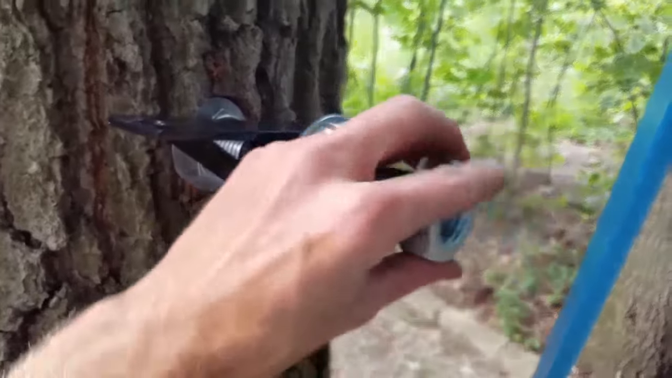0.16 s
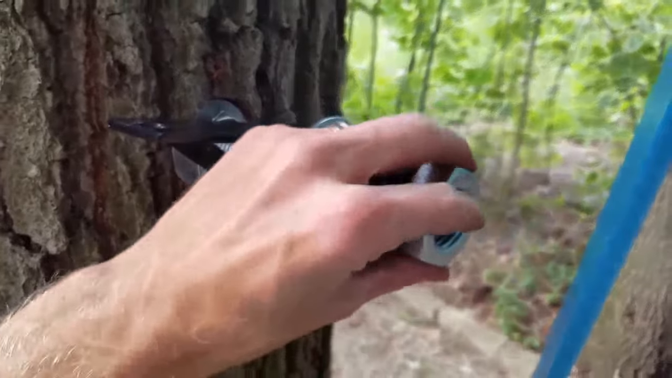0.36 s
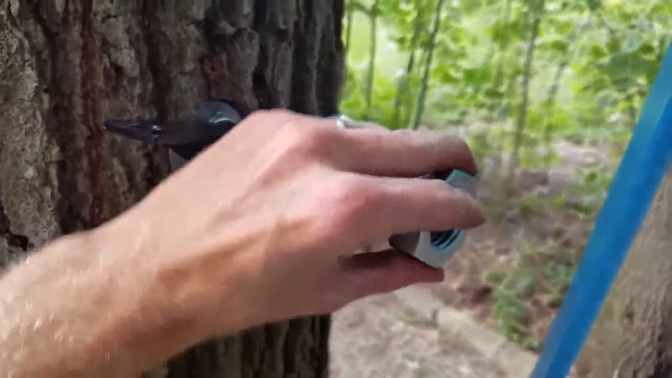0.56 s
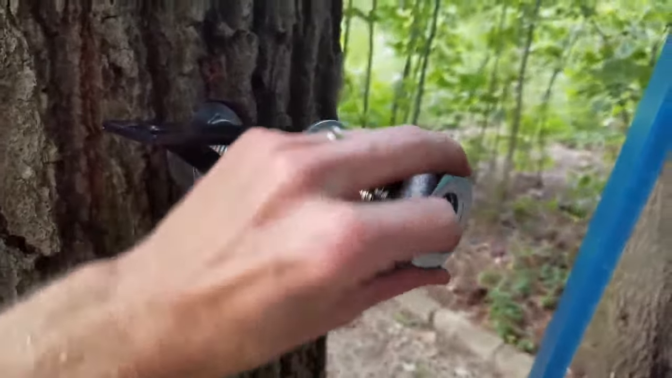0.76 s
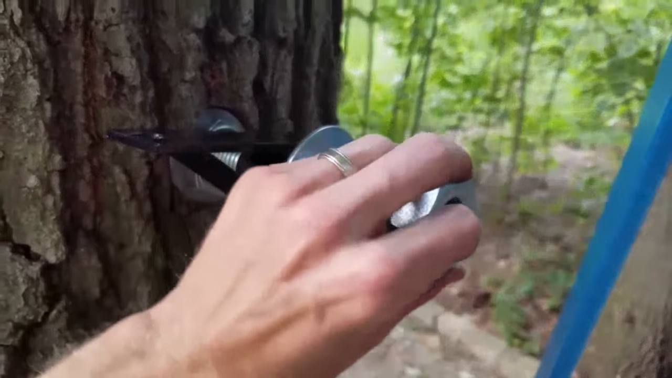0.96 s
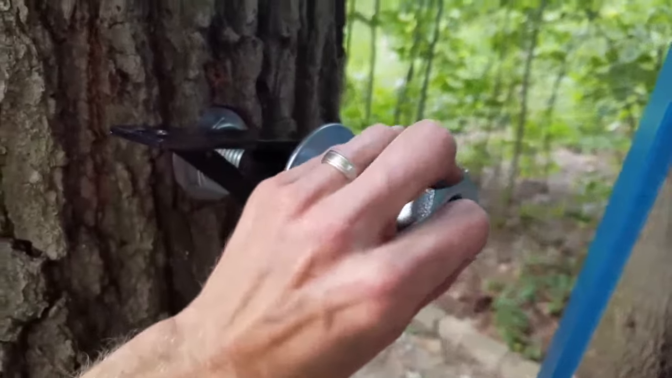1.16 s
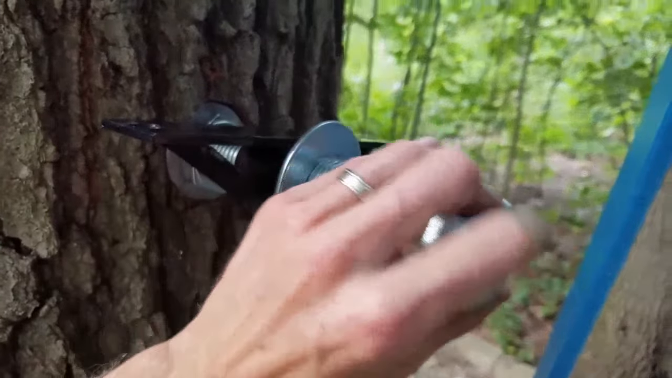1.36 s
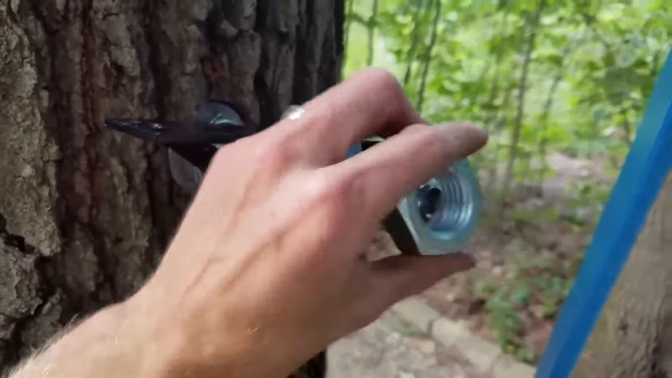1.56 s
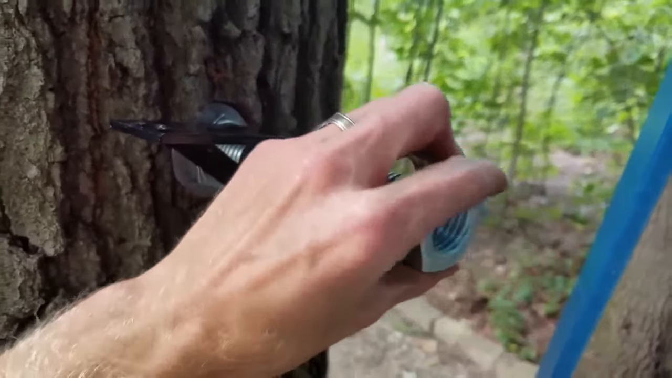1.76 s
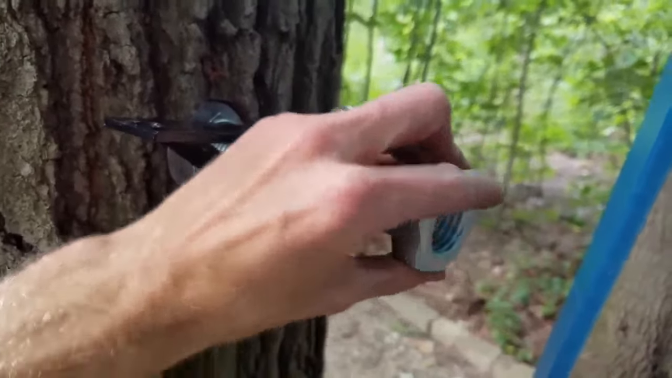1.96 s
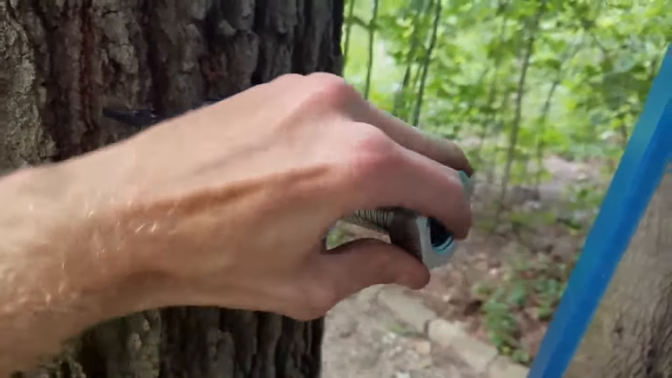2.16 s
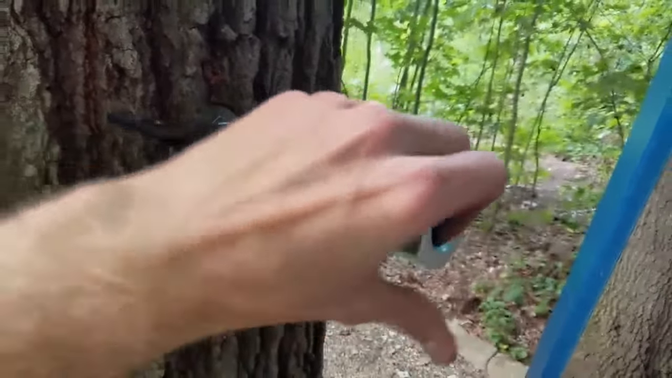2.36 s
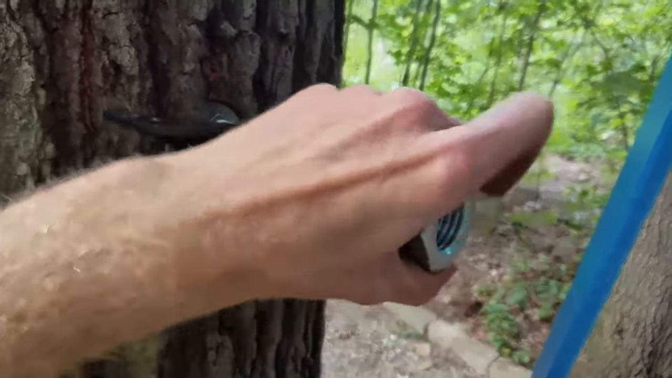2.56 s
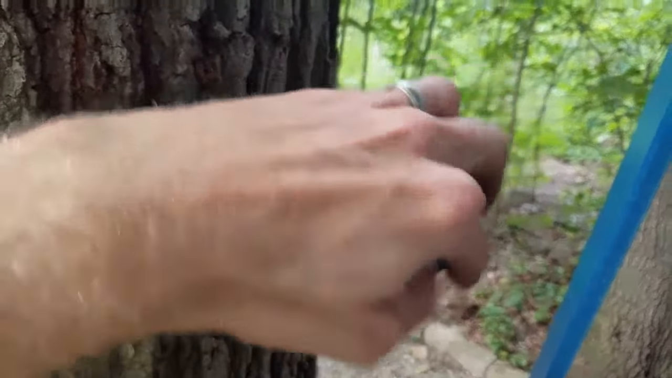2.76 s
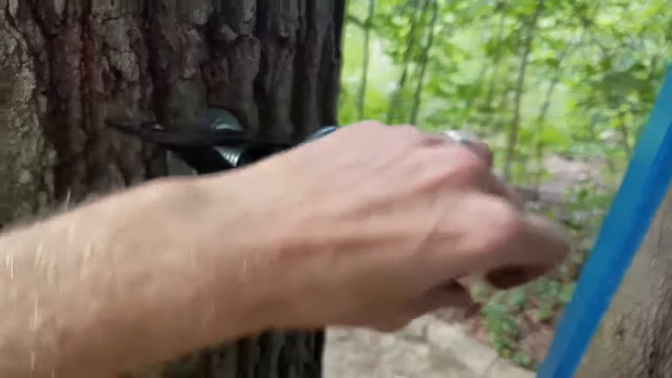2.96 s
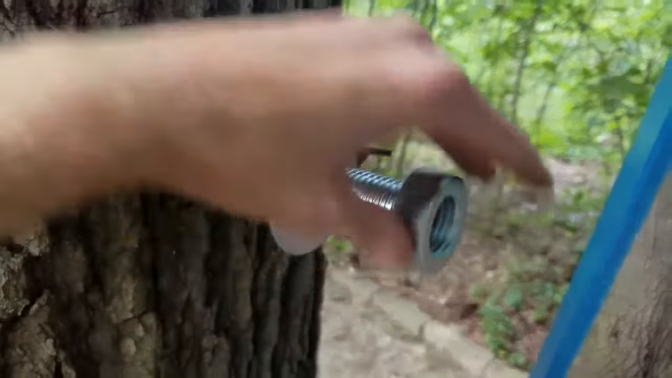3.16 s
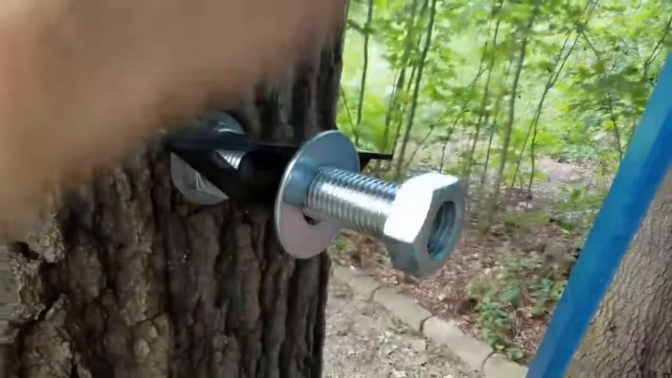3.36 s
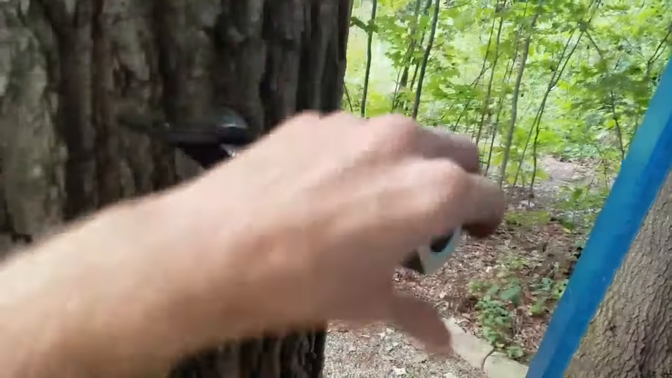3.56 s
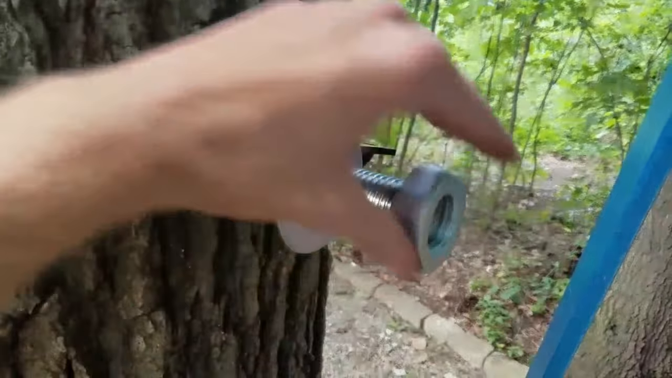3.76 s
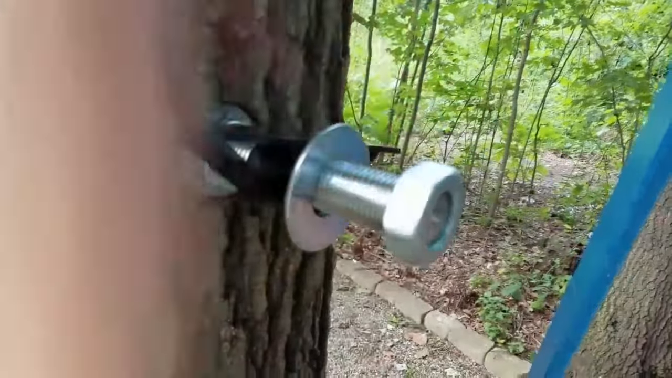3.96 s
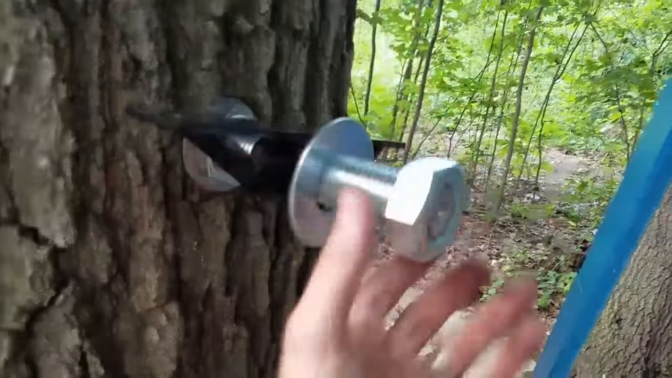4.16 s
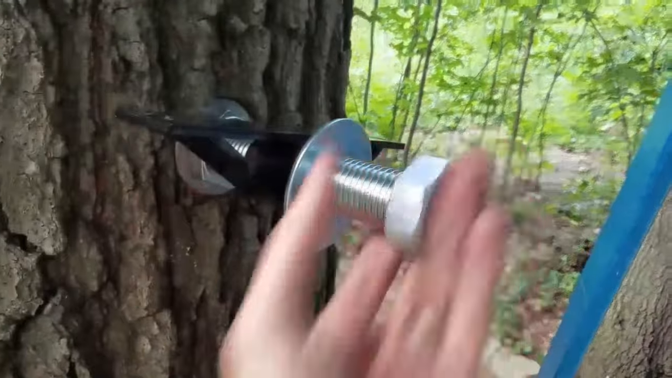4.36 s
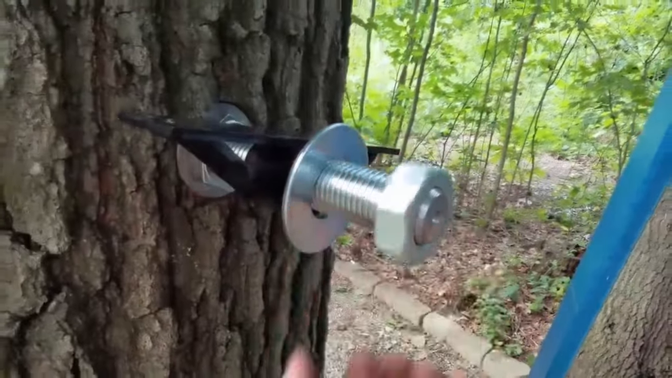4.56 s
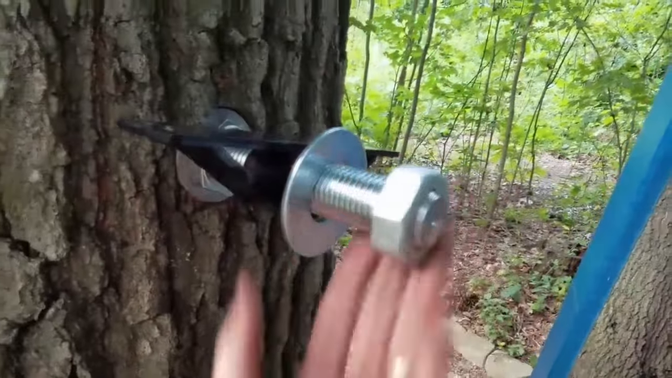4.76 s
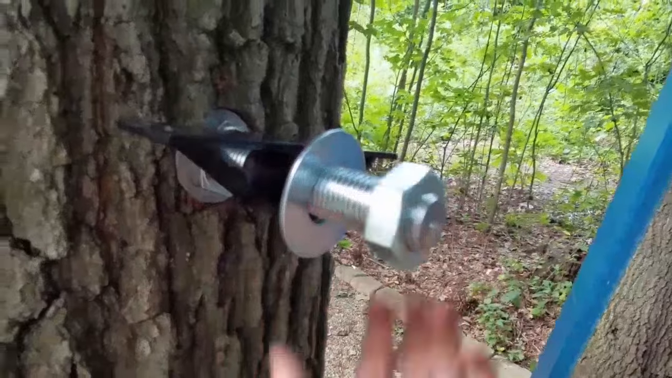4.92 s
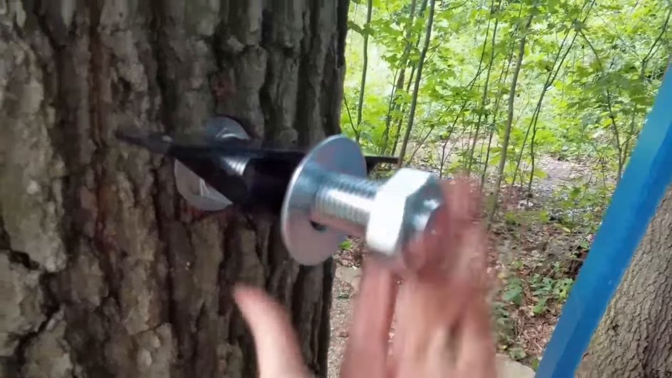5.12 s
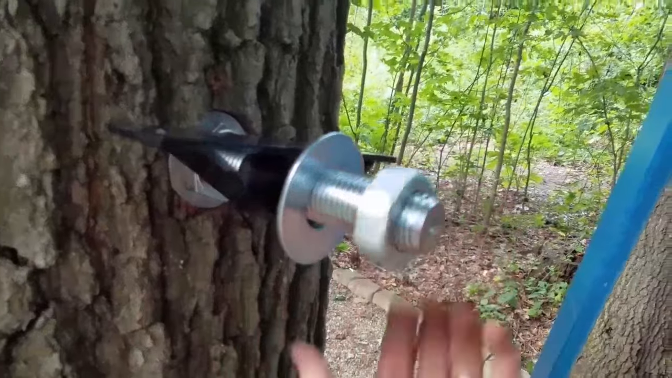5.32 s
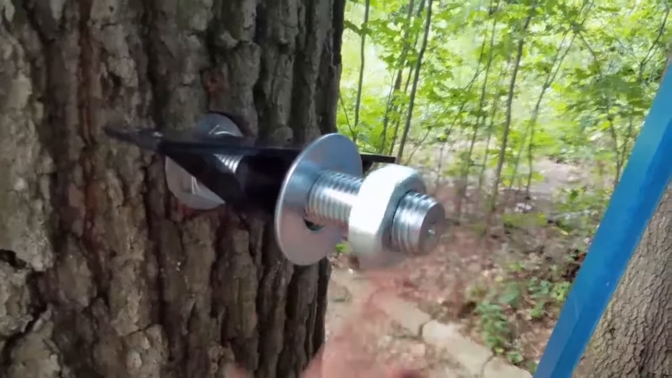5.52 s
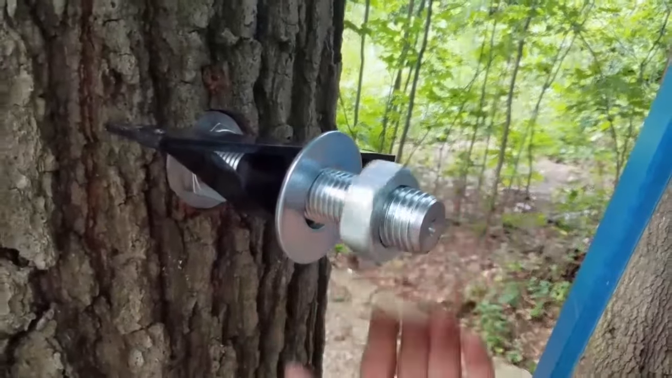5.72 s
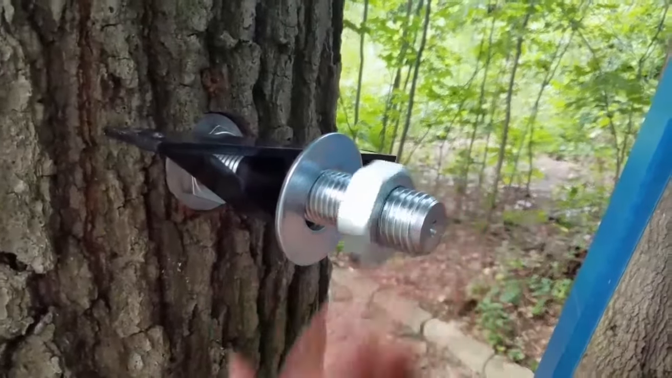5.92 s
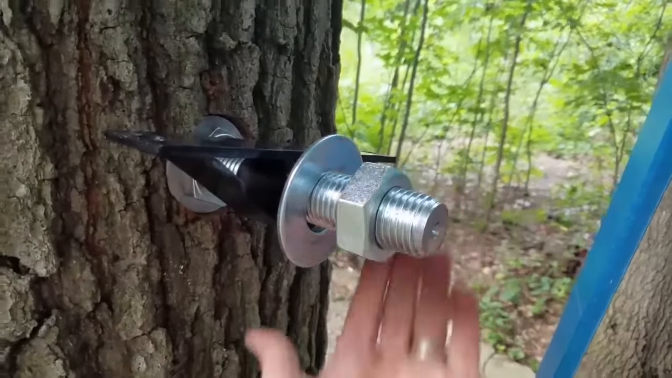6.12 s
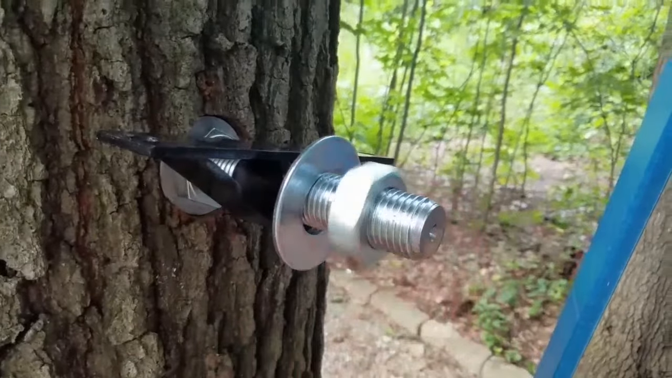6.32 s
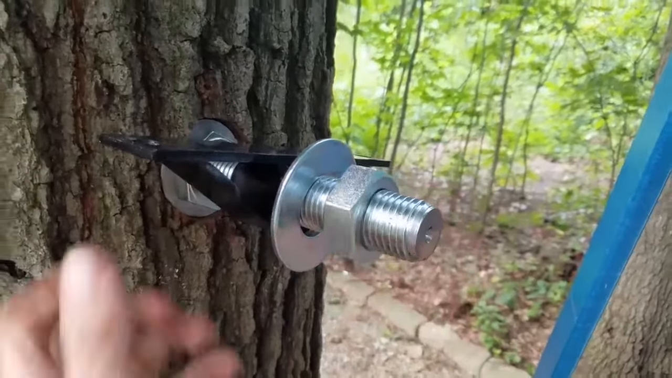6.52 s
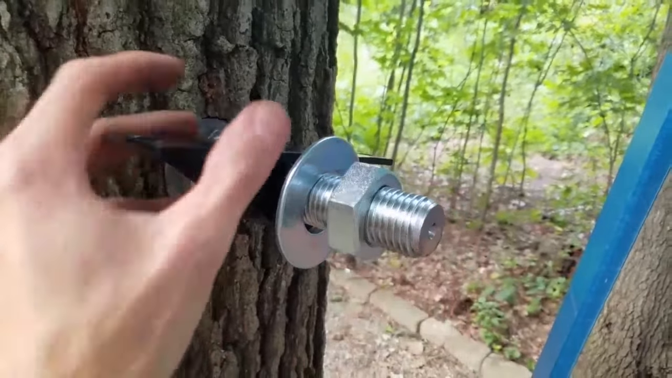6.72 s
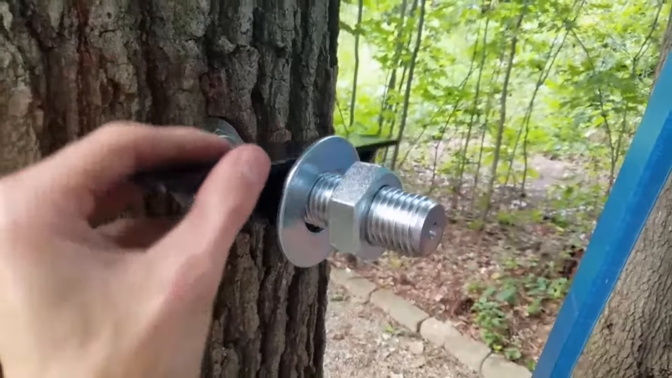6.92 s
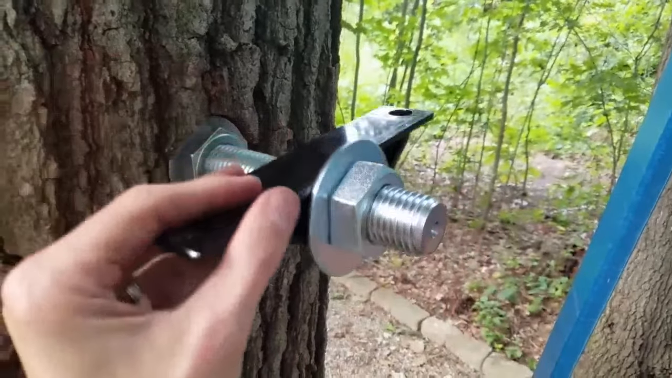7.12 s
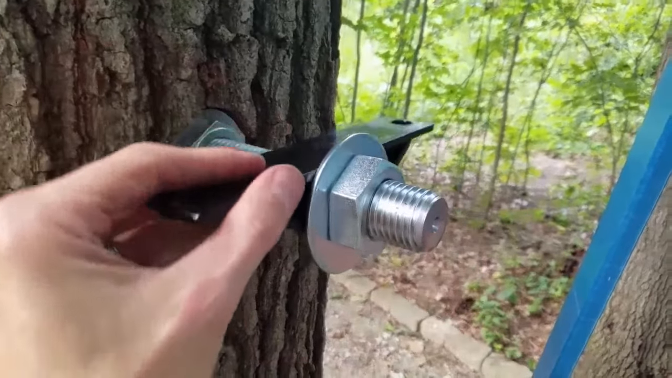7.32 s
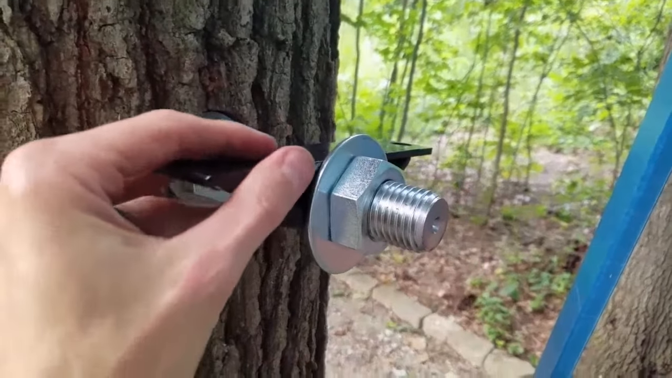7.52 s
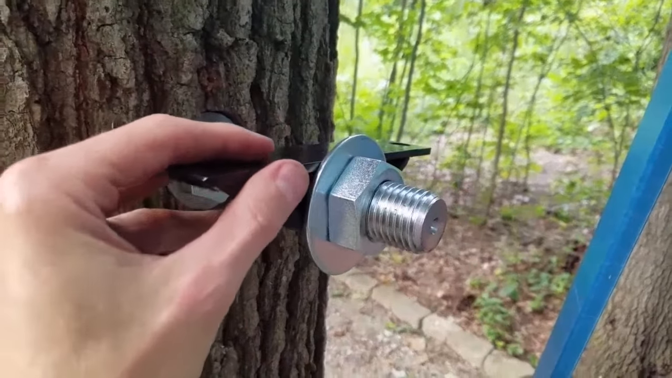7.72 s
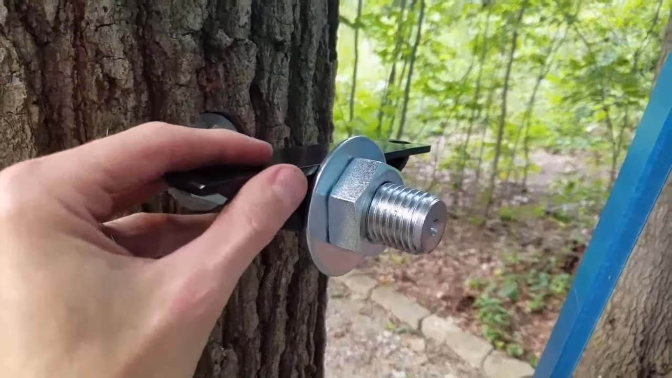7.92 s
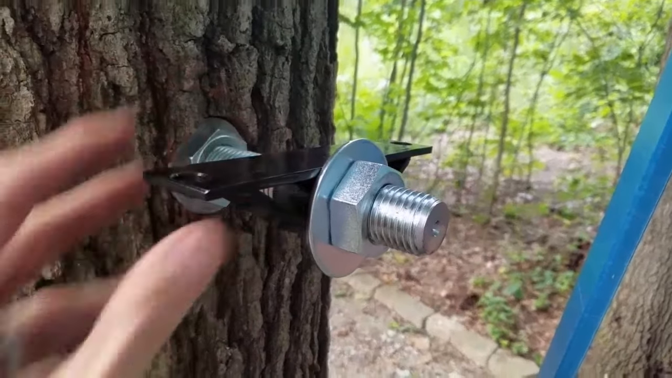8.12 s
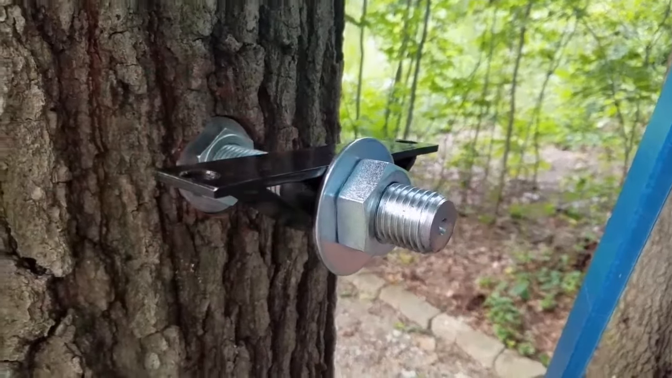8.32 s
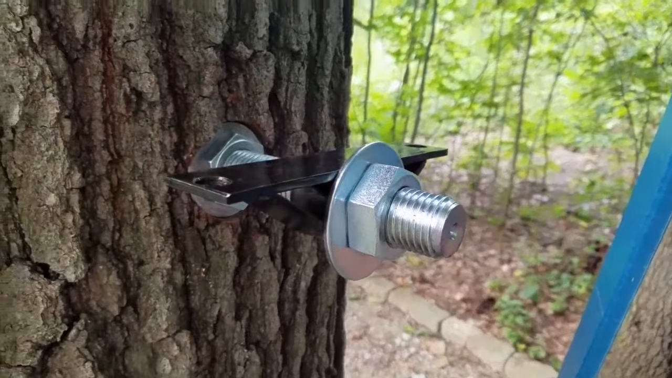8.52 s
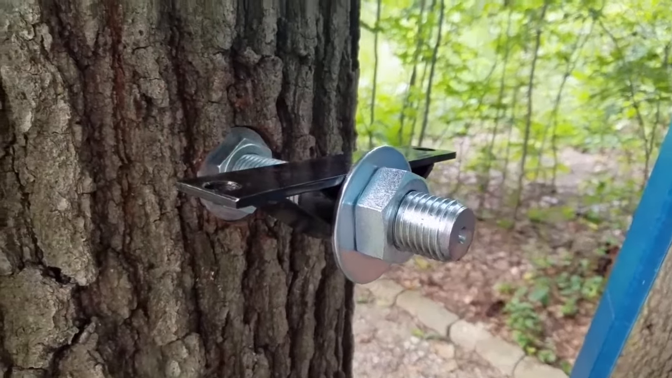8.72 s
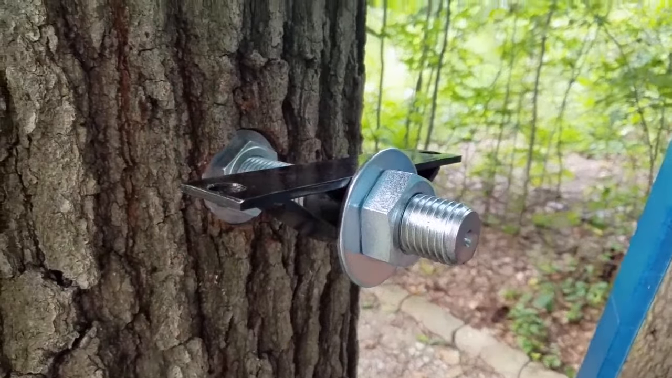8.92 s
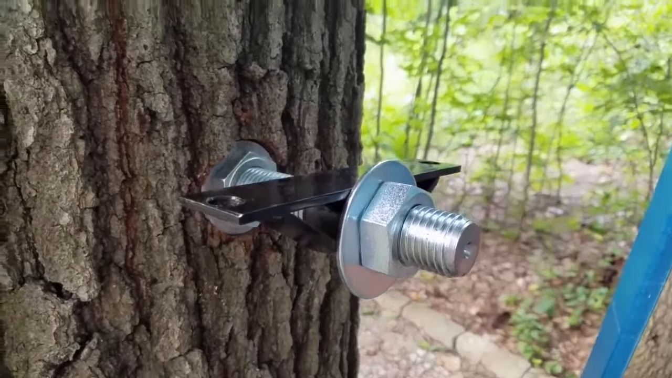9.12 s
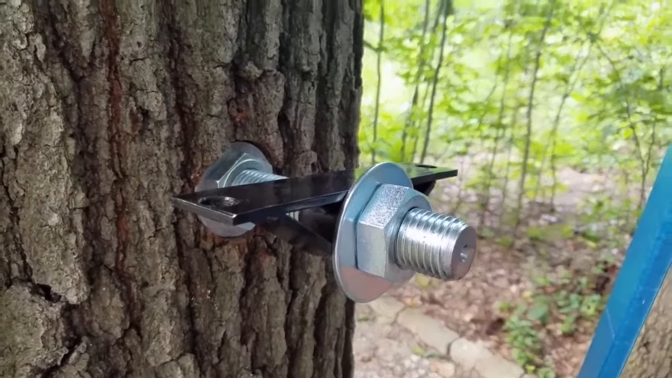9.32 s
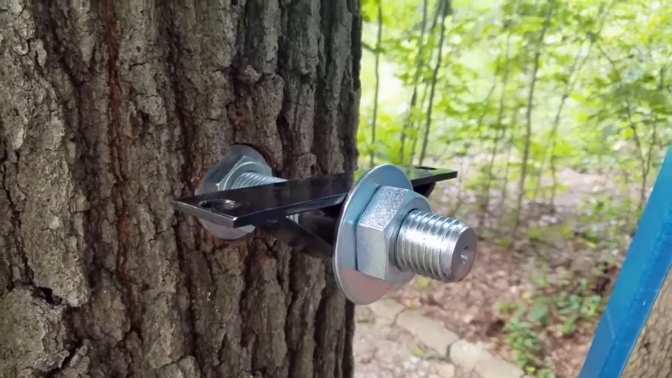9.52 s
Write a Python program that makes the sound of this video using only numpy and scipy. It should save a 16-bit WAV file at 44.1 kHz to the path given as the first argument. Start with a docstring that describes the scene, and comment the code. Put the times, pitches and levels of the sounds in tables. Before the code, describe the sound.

Quiet woodland: a low murmur of air and a faint, steady high insect hiss all around. Close up and slightly right, a heavy steel nut strikes a thick bolt in a tree at 0.3-0.5 s, a hard clank with a loose washer's thin hum. From 1.7 to 3.8 s it is turned by hand in uneven clinks, knocks and tiny thread rattles. From about 4 to 6.6 s come seven flicks, roughly every half second: a finger slap, a quick slip, then a short dry metallic whirr that fades or stops. At 7.15-7.3 s a bracket jerks round the bolt with a loud crack, coarse grinding and bright squeals, the washer ringing briefly. Small clinks follow at 7.6-7.7 s. Then mostly insects and air, with faint far bird whistles, one falling slightly then three rising, from 8.3 to 9.3 s, and a very soft knock near 8.8 s. Faint scattered echo.

```python
"""Woodland, close to a steel bolt in a tree: low air and hissing insects lie all around.
A big nut knocks on the bolt, is turned by hand and flicked along the thread: noise bursts, rings and chatter.
A loose washer clinks and hums as decaying sines. Late on, a bracket slips round the bolt: coloured noise
grinds and sines squeal. A far bird whistles with sliding sines, and a short noise tail echoes the steel."""
import sys
import numpy as np
from scipy import signal
from scipy.fft import rfft, irfft, next_fast_len
from scipy.io import wavfile
from scipy.ndimage import map_coordinates

SR = 44100
rng = np.random.default_rng(int(sys.argv[2]) if len(sys.argv) > 2 else 0)


def to_wav(s):
    """Save 16-bit WAV."""
    ch = np.atleast_2d(s).T  # columns
    pcm = np.round(np.clip(ch, -1, 1) * 32767)  # PCM
    wavfile.write(sys.argv[1], SR, pcm.astype(np.int16))


N = 422478  # length in samples


def amp(db):
    """Decibels to gain."""
    return 10 ** (np.asarray(db) / 20)


def unit(x):
    """Scale to rms 1."""
    return x / np.sqrt(np.mean(x ** 2) + 1e-20)


def along(points, hz):
    """Read a curve of (Hz, value) points on a log frequency axis."""
    f, v = np.transpose(points)
    return np.interp(np.log(hz + 1), np.log(f + 1), v)


def gains(rows, outside=-120):
    """One gain per sample for each dB column after the time; None holds the end values."""
    s, *cols = np.transpose(rows)
    t = np.arange(N) / SR
    return np.array([amp(np.interp(t, s, c, outside, outside)) for c in cols])


def wobble(rate, size=N):
    """A smooth random curve with rate knots a second."""
    knots = rng.standard_normal(int(size * rate / SR) + 4)
    return map_coordinates(knots, [np.arange(size) * rate / SR])


def since(s):
    """Seconds elapsed after time s, zero before it."""
    return np.maximum(np.arange(N) / SR - s, 0)


def add(track, s, sound):
    """Mix a stereo sound in at time s."""
    part = track[:, round(s * SR):][:, :sound.shape[-1]]
    part += sound[..., :part.shape[1]]


def noise(size=N):
    """Two unrelated white noises."""
    return rng.standard_normal((2, size))


def tone(cycles, alike=0.8):
    """A sine of random phase; a mode's radiation pattern sets how alike left and right hear it."""
    apart = np.arccos(np.clip(alike, -1, 1)) / 2
    return np.sin(2 * np.pi * (cycles + rng.random()) + np.array([[-apart], [apart]]))


def ring(modes, scatter_db, detune, size=2 * SR):
    """Struck steel: the point of contact, drawn at random, shifts each mode's strength and pitch."""
    t = np.arange(size) / SR
    out = 0
    for hz, db, t60 in modes:
        decay = amp(db + scatter_db * rng.standard_normal() - 60 * t / t60)
        out = out + decay * tone(hz * (1 + detune * rng.standard_normal()) * t)
    return out


# stereo width of the close steel: pitch_hz, left_right_likeness (1 = same, 0 = unrelated)
STEEL_WIDTH = [(300, .9), (700, 0.35), (1500, 0.47), (3000, 0.31), (12000, .2)]


def colour(pair, spectrum, alike=STEEL_WIDTH, size=2048):
    """Causal (minimum-phase) filter of unit power; two unrelated inputs become left and right."""
    hz = np.fft.rfftfreq(size, 1 / SR)
    inside = np.clip(hz + 1, spectrum[0][0], spectrum[-1][0])
    octaves_outside = np.abs(np.log2((hz + 1) / inside))
    cepstrum = irfft(np.log(amp(along(spectrum, hz) - 16 * octaves_outside)))
    # fold the cepstrum so the filter never sounds ahead of its input
    cepstrum[1:size // 2] *= 2
    cepstrum[size // 2 + 1:] = 0
    response = np.exp(rfft(cepstrum))
    turn = np.arccos(np.clip(along(alike, hz), -1, 1)) / 2
    taps = irfft(response * [np.cos(turn), np.sin(turn)])[:, :size // 2]
    mid, side = signal.fftconvolve(pair, taps / np.linalg.norm(taps), axes=1)[:, :N]
    return np.array([mid + side, mid - side])


def left_first(pair):
    """The sound reaches the right side a little later."""
    lag = 7  # samples
    return np.array([pair[0], np.pad(pair[1], (lag, 0))[:N]])


# how the bed drifts, before its lift and flutter: time_s, air_db, insects_db
BED_LEVELS = [(0, -64.5, -62), (1.6, -65, -63), (3.2, -63, -62.5), (5.5, -62.5, -61.5), (6.8, -63.5, -62),
              (7.85, -67, -64), (8.7, -62.5, -63), (9.58, -64.5, -63)]
# murmur of the air: pitch_hz, density_db (per Hz, relative)
AIR_SPECTRUM = [(15, -42.5), (25, 3.5), (88, 2.5), (213, -8.5), (395, -3.5), (1190, -9.5), (1440, -10),
                (2070, -14), (2790, -13.5), (3040, -16.5), (4000, -21), (5200, -50), (8800, -120)]
# insect hiss: pitch_hz, density_db (per Hz, relative)
INSECT_SPECTRUM = [(3800, -24), (4250, -15), (4650, 0), (5300, -1), (5800, -7), (6500, -6), (7500, -11),
                   (9000, -27), (11000, -15), (13000, -11.5), (14500, -15.5)]
# stereo width of the bed: pitch_hz, left_right_likeness
BED_WIDTH = [(60, 1), (300, 0.1), (620, 0.34), (1360, 0), (6500, 0.0075)]


def woodland():
    """Low murmur of the air and a steady chorus of insects, both noise with a small flutter in level."""
    air_gain, insect_gain = gains(BED_LEVELS, outside=None)
    air = air_gain * amp(2 + .87 * wobble(4.4)) * colour(noise(), AIR_SPECTRUM, BED_WIDTH)
    insects = insect_gain * amp(3 + .5 * wobble(16)) * colour(noise(), INSECT_SPECTRUM, BED_WIDTH)
    return air + insects


# single contacts of steel on the bolt: time_s, level_db, then relative to it thud_db, crack_db, nut_ring_db
KNOCKS = [(.325, -33.5, -2.5, -3, -27), (.342, -27.5, -31, -22.5, -17), (.359, -30, -10, -15, -19.5),
          (.382, -17, -14.5, -8, -11), (.523, -35, -14, -19, -21), (.533, -40, -1.5, -21, -21),
          (1.338, -55.5, -11, 4, -19), (1.704, -22.5, -46, -16.5, -22), (1.808, -18, -19, -18.5, -6.5),
          (1.944, -32, -5, -28, -25), (1.991, -34, -9, -20, -5), (2.065, -26.5, -15, -20, -14),
          (2.111, -35.5, -20, -22, -20), (2.166, -53, 7, -8, -19), (2.323, -41, -21, -25, -30),
          (2.435, -55, -14, -15, -18), (2.659, -37.5, -31, -31, -36), (2.738, -50, 4, -25, -28),
          (2.876, -34.5, -16, -29, -22), (2.896, -33, -30, -29, -30), (2.972, -32.5, -32, -32, -30),
          (3.213, -30, -36, -36, -29), (3.223, -44, -11, -25, -21), (3.489, -36.5, -26, -15, -15),
          (3.686, -53, -15, -22, -28), (3.843, -25.5, -26, -6, -1.5), (4.042, -33, -20, -8, -6.5),
          (4.765, -38, -24, -20, -12), (4.93, -30.5, -12, -13.5, -5), (5.332, -37, -12, -2.5, -20),
          (5.779, -36.5, -17, -10, -7), (6.143, -36, -16, -12, -15), (6.212, -41, -20, -24, -20),
          (7.047, -52.5, 9, -11, -13), (7.153, -36.5, -6.5, -10, -20), (7.175, -29, -13, 1.5, -8),
          (7.184, -17.5, -30, -3.5, -11), (7.196, -13.5, -44, -3, -8), (7.247, -16, -30, -3, -11),
          (7.254, -21, -25, -2, -12), (7.61, -44, -18, -9, -16), (7.705, -35, -35, -4.5, -13.5),
          (8.771, -48, 0, -23, -29.5)]
# flicks of the nut: touch_s, slip_s, stop_s, slap_db, slip_knock_db, rattle_db,
# coast_fade (dB per s), finger_hiss_db
FLICKS = [(3.952, 4.024, 4.26, -49, -30, -39, 42, -63), (4.508, 4.629, 4.76, -29.5, -26, -42.5, 55, -57),
          (4.921, 4.999, 5.2, -24.5, -26.5, -43.5, 91, -64),
          (5.268, 5.392, 5.61, -36.5, -30.5, -41, 10, -61),
          (5.657, 5.747, 5.97, -25.5, -31, -38.5, 26, -62), (6.056, 6.17, 6.35, -24.5, -35.5, -42, 65, -63),
          (6.462, 6.574, 6.645, -22, -38, -37, 74, -61)]
# mix of the flick knocks, relative to their level: thud_db, crack_db, ring_db
FLICK_KNOCK_MIX = (-15.5, -12.5, -9)


def contacts():
    """The single knocks, plus two a flick: the fingers slap the nut, then slip off it."""
    rows = list(KNOCKS)
    for touch, slip, _, slap_db, slip_db, *_ in FLICKS:
        rows += [(touch, slap_db, *FLICK_KNOCK_MIX), (slip, slip_db, *FLICK_KNOCK_MIX)]
    return rows


# thud in the trunk: pitch_hz, density_db (per Hz, relative)
THUD_SPECTRUM = [(110, -22), (230, -12), (330, 1), (470, -7), (620, 4.5), (1000, -8), (1800, -17)]
# the bolt held in the trunk: pitch_hz, density_db (per Hz, relative)
BOLT_SPECTRUM = [(150, -25.5), (240, -22.5), (325, -12), (480, -17.5), (590, -4.5), (750, -6.5), (980, 0.5),
                 (1400, -1.5), (1680, 2.5), (2300, -3), (3000, 2.5), (3500, -5), (4200, -18.5), (5500, -25)]
# bright steel edge of cracks, rattle and finger hiss: pitch_hz, density_db (per Hz, relative)
BRIGHT_SPECTRUM = [(2500, -18.5), (4000, 1.5), (5500, 6), (7000, -5), (9000, -11), (12000, -7),
                   (14500, -17)]
# modes of the nut: tip_pitch_hz, tip_level_db (at the bolt's tip), seated_pitch_hz, seated_level_db
# (on the thread), t60_s
NUT_MODES = [(2200, -16, 2265, -14, .13), (2500, -14, 2492, -18, .1), (2904, 2, 2995, 0, .068),
             (3946, -16, 3470, -14, .11), (5520, -7.5, 5110, 0.5, .075), (7200, -28, 4100, -25, .1),
             (8720, -26, 7700, -22.5, .12), (10200, -27, 10670, -25, .08), (12400, -34, 13750, -28, .09),
             (14140, -21, 14200, -20, .11)]
SEATED_S = 3.2  # later knocks ring with the seated modes


def knocks():
    """Each contact is a crack, a damped shudder of the bolt, a thud in the trunk and a ring of the nut."""
    thud, shudder, crack, steel = np.zeros((4, 2, N))
    t = np.arange(SR // 6) / SR
    shudder_t60 = .052  # s
    for s, db, thud_db, crack_db, ring_db in contacts():
        attack = 1 - np.exp(-(t / .0015) ** 2)
        decay = amp(-60 * t / .012) + .65 * amp(-60 * t / shudder_t60)
        blow = attack * decay * noise(len(t))
        blow[0, round(.002 * SR)] += 5  # the hard first touch
        add(thud, s, amp(db + thud_db) * blow)
        add(shudder, s, amp(db) * blow)
        add(crack, s, amp(db + crack_db) * blow)
        modes = [(*(mode[2:4] if s > SEATED_S else mode[:2]), mode[4]) for mode in NUT_MODES]
        nut = ring(modes, scatter_db=2, detune=.003, size=len(t))
        damping = amp(-60 * t / .031) if s > 4.3 else 1  # the flicking fingers damp the ring
        add(steel, s + .002, amp(db + ring_db) * nut * damping)
    blows = colour(thud, THUD_SPECTRUM) + colour(shudder, BOLT_SPECTRUM) + colour(crack, BRIGHT_SPECTRUM)
    return left_first(blows) + steel


# modes of the ringing washer: pitch_hz, level_db, t60_s (ringing freely)
WASHER_MODES = [(2935, -17, .3), (3730, -19, 0.247), (5895, -16.5, .15), (7760, -9, 0.26), (7725, 0, .11),
                (10640, -17, .2), (13690, 0, .12)]
# jolts of the washer: time_s, clink_db, ring_time_share (of the free t60), hum_db, hum_t60_s
CLINKS = [(.384, -48, 1.5, -55, 3.3), (1.809, -52, 1.2, -59, 3), (6.464, -57, 1, -58, 2),
          (7.305, -37, .8, -45, .65), (7.707, -38.5, 0.43, -70, .2)]
HUM_HZ = 2880  # the washer's lowest mode


def washer():
    """The loose washer clinks when jolted, and its lowest mode hums on after the clink."""
    out = np.zeros((2, N))
    t = np.arange(2 * SR) / SR
    for s, db, freedom, hum_db, hum_t60 in CLINKS:
        modes = [(hz, level, life * freedom) for hz, level, life in WASHER_MODES]
        add(out, s, amp(db) * ring(modes, scatter_db=1, detune=0, size=SR // 2))
        add(out, s, amp(hum_db - 60 * t / hum_t60) * tone(HUM_HZ * t, alike=-.3))
    return out


# the nut turned between the fingers: middle_s, length_s, rattle_db
TURNS = [(1.762, 0.047, -40), (1.953, 0.033, -42), (1.996, .04, -39.5), (2.062, .03, -45.5),
         (2.326, 0.027, -46), (2.64, 0.04, -58), (2.749, 0.022, -50), (2.90, 0.05, -47),
         (3.013, 0.044, -52), (3.104, 0.053, -54), (3.423, 0.15, -43), (3.744, 0.035, -53),
         (3.996, 0.028, -37)]
TURN_HISS_DB, THREAD_HISS_DB = -27, -27  # hiss in turns and in flicks, relative to the rattle
PUSH_DB, SETTLE_DB, SETTLE_S = 16, 4, .037  # growth under the push; drop once the fingers are off
STOP_DB_PER_S, HISS_DB_PER_S = 450, 227  # fade of the flick at its stop; of finger hiss after the slip
FREE_S = .072  # time for the rattle to mellow after the fingers leave


def nut_motion():
    """Gains of pressed rattle, free rattle and hiss: turns swell and fade, flicks build up and coast."""
    t = np.arange(N) / SR
    pressed = np.zeros(N)
    for s, length, db in TURNS:
        pressed += amp(db) * np.exp(-np.minimum((2 * (t - s) / length) ** 2, 20))
    free, hiss = np.zeros(N), amp(TURN_HISS_DB) * pressed
    for touch, slip, stop, _, _, db, fade, hiss_db in FLICKS:
        push = np.clip((t - touch) / (slip - touch), 0, 1)
        coast = since(slip)
        moving = (t > touch) * amp(-STOP_DB_PER_S * since(stop))
        build_db = -PUSH_DB * (1 - push) ** 1.2
        settle_db = -SETTLE_DB * (1 - np.exp(-coast / SETTLE_S))
        spin = moving * amp(db + build_db + settle_db - fade * coast)
        grip = np.exp(-coast / FREE_S)
        pressed += grip * spin
        free += (1 - grip) * spin
        fingers = moving * amp(hiss_db - 5 * (1 - push) - HISS_DB_PER_S * coast)
        hiss += fingers + amp(THREAD_HISS_DB) * spin
    return pressed, free, hiss


def thread_impacts(size, count=5):
    """Tiny impacts of uneven size at a few points of the thread, each point with resonances of its own."""
    hit = rng.random((count, 1, size)) < 85 / SR  # about 85 a second at each point
    taps = hit * amp(5 * np.clip(rng.standard_normal(hit.shape), -2, 1.7))
    t = np.arange(SR // 25) / SR
    decay = amp(-60 * t / .004) + .4 * amp(-60 * t / .045)
    bodies = rng.standard_normal((count, 2, len(t))) * decay
    return unit(signal.fftconvolve(taps, bodies, axes=2).sum(0)[:, :size])


# the freely running nut: pitch_hz, density_db (per Hz, relative)
COASTING_SPECTRUM = [(180, -42.5), (300, -16), (585, -10), (804, -15), (964, -1), (1430, -8.5), (1740, -3),
                     (2230, -14.5), (2990, -5.5), (4060, -20), (4500, -22), (5850, -29), (9900, -120)]
# the nut's highest mode: pitch_hz, density_db (per Hz, relative)
WHINE_SPECTRUM = [(13400, -30.5), (14000, -15.5), (14140, 2.5), (14280, -11), (14700, -28)]


def spinning_nut():
    """The loose nut chatters over the thread, its highest mode sings and fingers brush its flats."""
    pressed, free, hiss = nut_motion()
    # the points of contact move on every quarter second
    blocks = [thread_impacts(SR // 4) for _ in range(0, N, SR // 4)]
    impacts = np.hstack(blocks)[:, :N]
    clumps = amp(1.5 * wobble(45))  # the chatter comes in clumps
    drive = unit(clumps * (impacts + .15 * noise()))
    rattle = pressed + free
    body = amp(2) * colour(pressed * drive, BOLT_SPECTRUM)
    body += amp(2) * colour(free * drive, COASTING_SPECTRUM)
    body += amp(-20) * colour(rattle * drive, THUD_SPECTRUM)
    edges = amp(-17.5) * colour(rattle * drive, BRIGHT_SPECTRUM)
    # fingers damp the nut until it is flicked
    running_free = gains([(3, -11.5), (4, -1.5)], outside=None)
    whine = amp(-11) * running_free * colour(rattle * clumps * noise(), WHINE_SPECTRUM)
    brushing = amp(7) * colour(hiss * noise(), BRIGHT_SPECTRUM)
    return body + edges + whine + brushing


def trees(x):
    """A weak scattered answer from trunks and ground: a dulled, decaying noise tail."""
    t = np.arange(SR // 2) / SR
    tail = noise(len(t)) * amp(-60 * t / .31) * (t > .006)
    tail = signal.sosfilt(signal.butter(1, 4000, fs=SR, output="sos"), tail)
    return signal.fftconvolve(x, tail / np.linalg.norm(tail[0]), axes=1)[:, :N]


# jerks of the bracket round the bolt: start_s, end_s, plate_db, scrape_db
JERKS = [(7.151, 7.18, -47.5, -68), (7.185, 7.252, -26, -24), (7.277, 7.304, -27, -19.5)]
JERK_ATTACK_S, JERK_T60 = .005, .1  # s
AFTER_DB, AFTER_T60 = -31, .38  # the bracket's faint after-ring: dB, s


def grinding():
    """Gains of plate and scrape: each jerk bites quickly, holds and rings out."""
    low, high = np.zeros((2, N))
    for start, end, plate_db, scrape_db in JERKS:
        release = amp(-60 * since(end) / JERK_T60) + amp(AFTER_DB - 60 * since(end) / AFTER_T60)
        shape = (1 - np.exp(-since(start) / JERK_ATTACK_S)) * release
        low += amp(plate_db) * shape
        high += amp(scrape_db) * shape
    return low, high


def chatter(rate, spread_db, t60, smooth):
    """Dense tiny impacts of random size over smooth sliding, rms 1."""
    hits = rng.random(N) < rate / SR
    sizes = hits * amp(spread_db * np.clip(rng.standard_normal(N), -2, 2))
    power = signal.lfilter([1], [1, -amp(-120 / (t60 * SR))], sizes ** 2)
    return unit(noise() * np.sqrt(power / power.mean() + smooth))


# body of the bracket: pitch_hz, density_db (per Hz, relative)
PLATE_SPECTRUM = [(300, -34), (405, -2), (520, -16.5), (720, 0), (960, -1), (1150, -9), (1550, 5),
                  (1950, -6.5), (2500, 2.5), (3100, 2.5), (4200, -7)]
# dry scrape on top: pitch_hz, density_db (per Hz, relative)
SCRAPE_SPECTRUM = [(3000, -20.5), (4200, -5), (5900, -4), (6500, -15), (7000, -14.5), (7600, -2.5),
                   (8500, -17.5), (9400, -9.5), (10200, 0.5), (12000, 1.5), (14300, -2)]
# modes of washer or bracket that friction keeps singing: start_s, end_s, pitch_hz, level_db, t60_s,
# left_right_likeness
SQUEALS = [(7.153, 7.18, 2259, -42, .1, .9), (7.182, 7.235, 2259, -26.5, 0.11, .9),
           (7.194, 7.25, 2652, -26.5, .12, .7), (7.186, 7.256, 2880, -12.5, .08, -.6),
           (7.194, 7.226, 3782, -19.5, .08, -0.11), (7.2, 7.228, 5000, -28, 0.073, 1),
           (7.222, 7.258, 6015, -21.5, .055, -.6), (7.197, 7.256, 7578, -16.5, .08, .45),
           (7.185, 7.24, 13700, -23.5, .05, .6), (7.24, 7.264, 13680, -17.5, .05, .6),
           (7.23, 7.255, 10645, -13.5, .05, 0), (7.277, 7.308, 7575, -11, .045, .37),
           (7.275, 7.29, 13648, -7.5, .11, 0.84), (7.3, 7.312, 13790, -18, .07, .6),
           (7.305, 7.33, 5893, -21.5, 0.15, -0.1)]


def bracket():
    """Dry steel grinds; stick-slip locks on to one mode after another, each ringing out when let go."""
    low, high = grinding()
    out = colour(low * chatter(rate=240, spread_db=3, t60=.016, smooth=.26), PLATE_SPECTRUM)
    out += colour(high * chatter(rate=460, spread_db=3, t60=.012, smooth=.37), SCRAPE_SPECTRUM)
    t = np.arange(SR // 2) / SR
    for start, end, hz, db, t60, alike in SQUEALS:
        let_go = np.maximum(t - (end - start), 0)
        swell = (1 - np.exp(-t / .00069)) * amp(db - 60 * let_go / t60)
        slipping = t < end - start
        pitch = hz + 28 * slipping * wobble(300, len(t))
        rough = amp(2 * slipping * wobble(260, len(t)))
        add(out, start, swell * rough * tone(np.cumsum(pitch) / SR, alike))
    return out


# calls of the far bird: start_s, length_s, start_pitch_hz, end_pitch_hz, level_db
WHISTLES = [(8.28, 0.22, 1500, 1447, -64.5), (8.52, 0.13, 2420, 2700, -65), (8.835, .17, 2310, 2770, -66.5),
            (9.193, 0.15, 2320, 2665, -66.5)]


def bird():
    """Far slurred whistles: wavering sines that slide in pitch and peak past their middle."""
    out = np.zeros((2, N))
    for s, length, start_hz, end_hz, db in WHISTLES:
        u = np.linspace(0, 1, int(length * SR))
        pitch = start_hz + (end_hz - start_hz) * u + 25 * wobble(118.95, len(u))
        add(out, s, amp(db) * np.sin(np.pi * u ** 1.5) * tone(np.cumsum(pitch) / SR))
    return out


def scene():
    """The steel is close and a little louder on the right; the wood lies all around."""
    bed = woodland() * amp([[-1.2], [1.2]])
    steel = knocks() + washer() + left_first(spinning_nut()) + bracket()
    steel = steel * amp([[-1.3], [1.3]])
    return bed + steel + amp(-19) * trees(steel) + bird()


def record(dry):
    """Peaks round off at full scale, then a steep band limit."""
    top_hz = 14750
    held = dry / (1 + dry ** 8) ** (1 / 8)
    m = next_fast_len(N + 8192)  # padded so the filter does not wrap round
    kept = np.fft.rfftfreq(m, 1 / SR) < top_hz
    return irfft(rfft(held, m) * kept, m)[:, :N]


dry = scene()
out = record(dry)
to_wav(out)
```